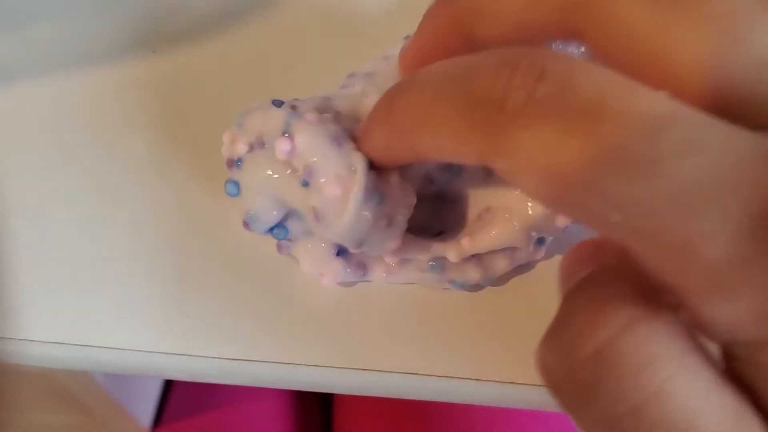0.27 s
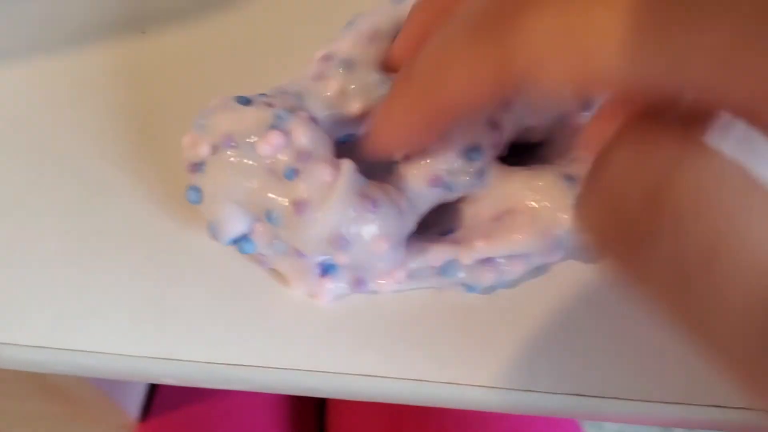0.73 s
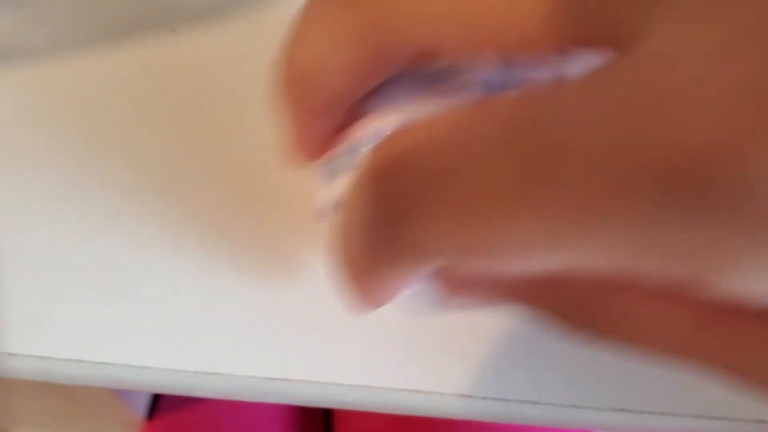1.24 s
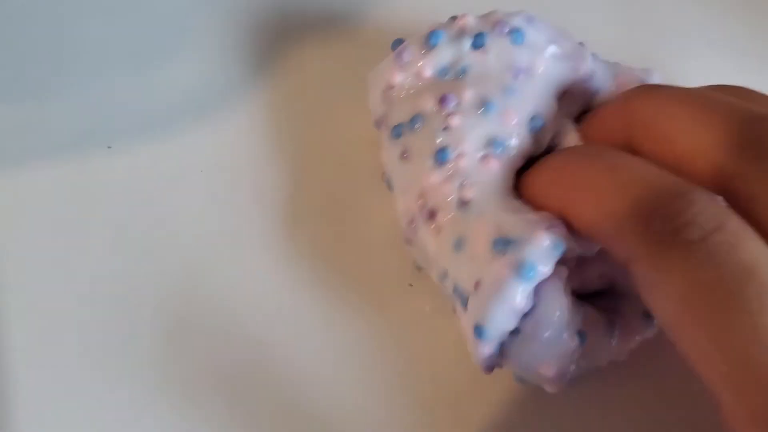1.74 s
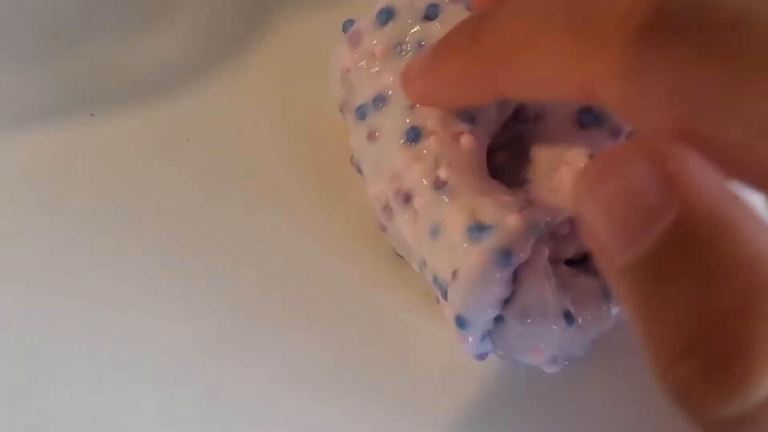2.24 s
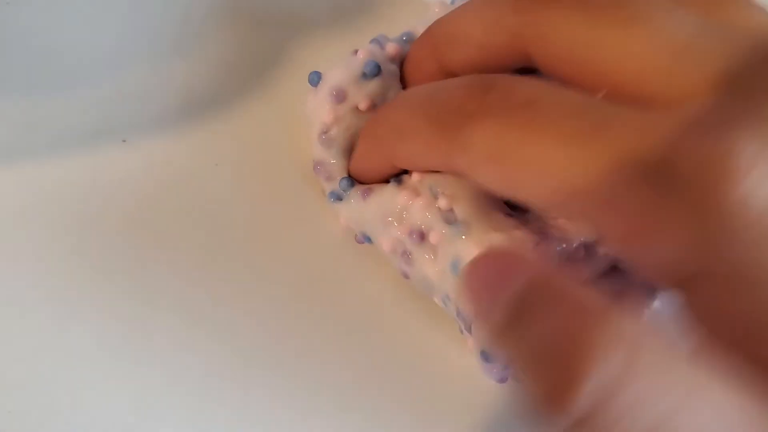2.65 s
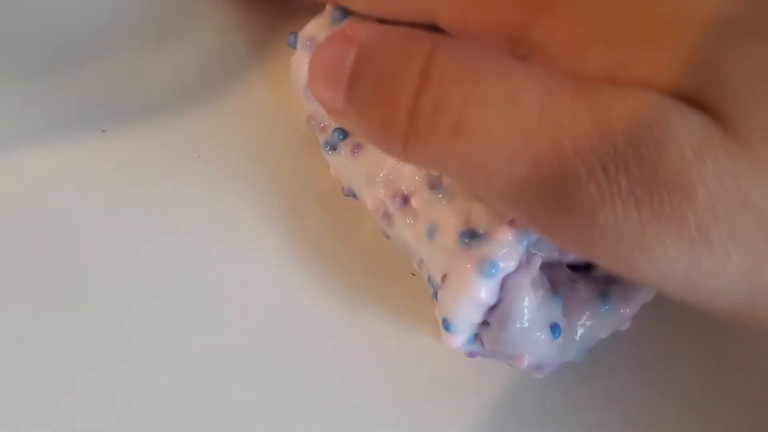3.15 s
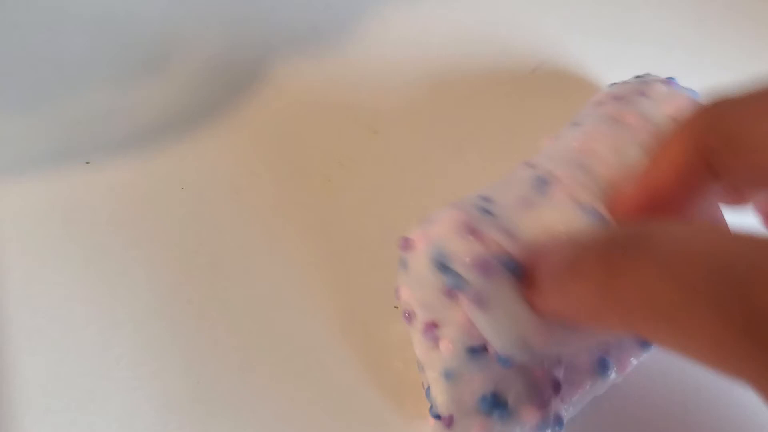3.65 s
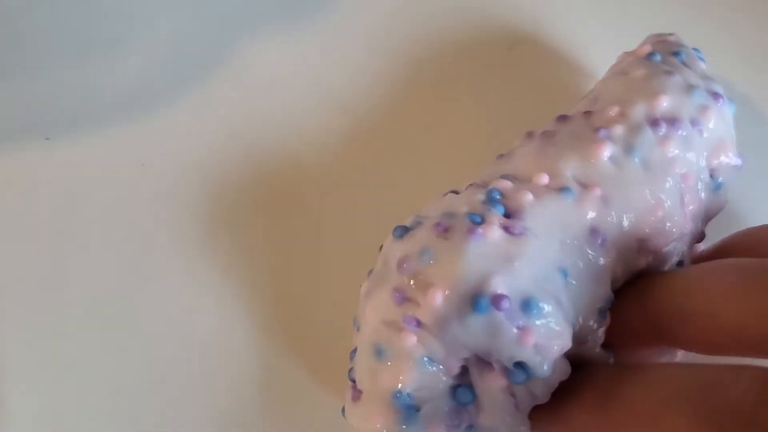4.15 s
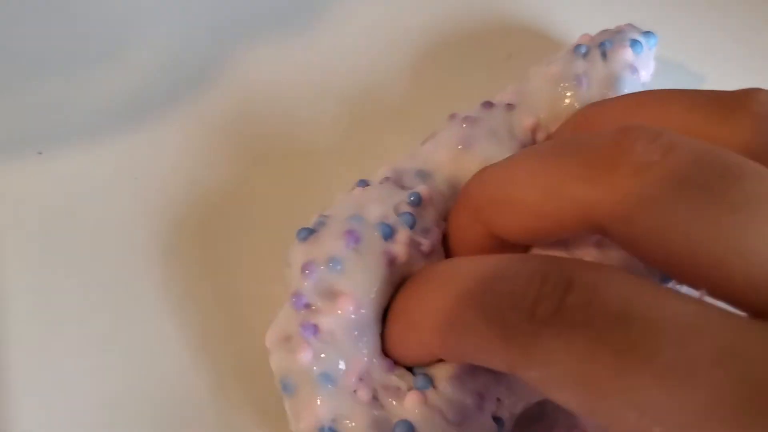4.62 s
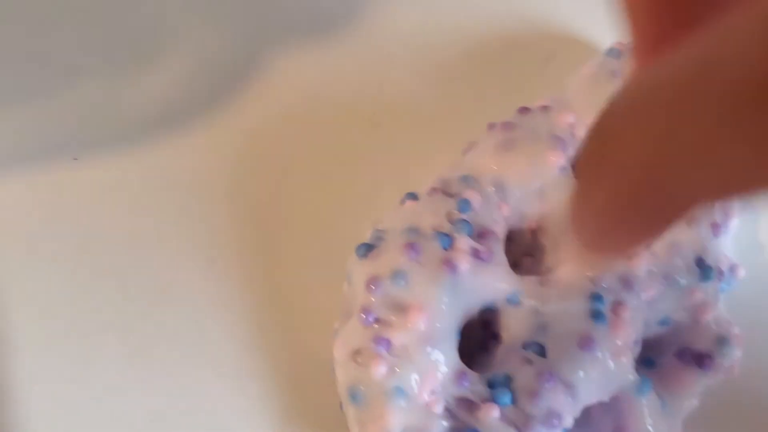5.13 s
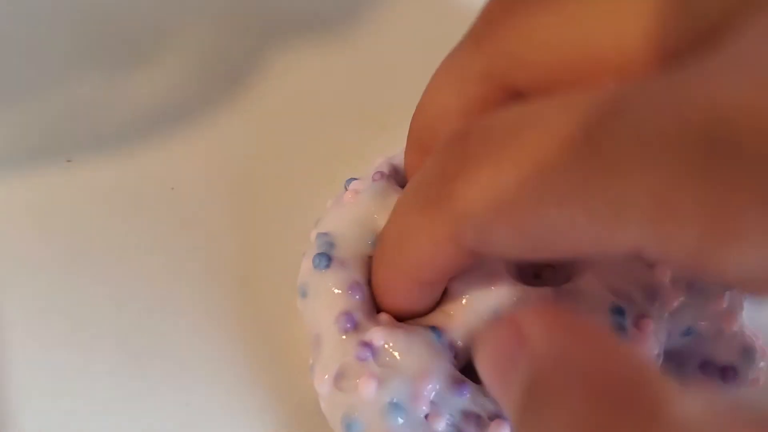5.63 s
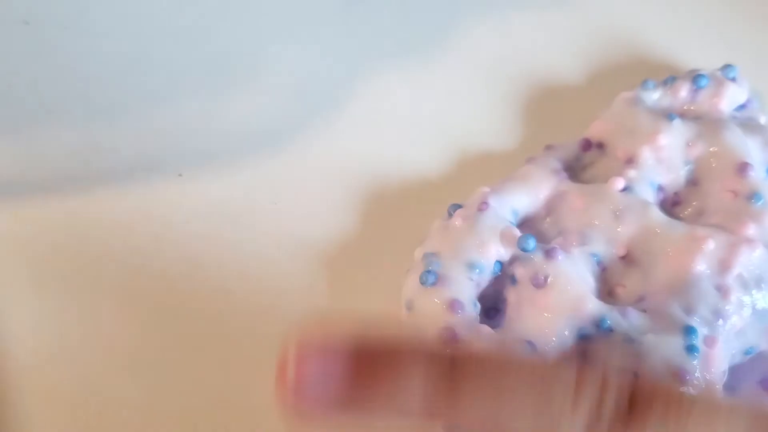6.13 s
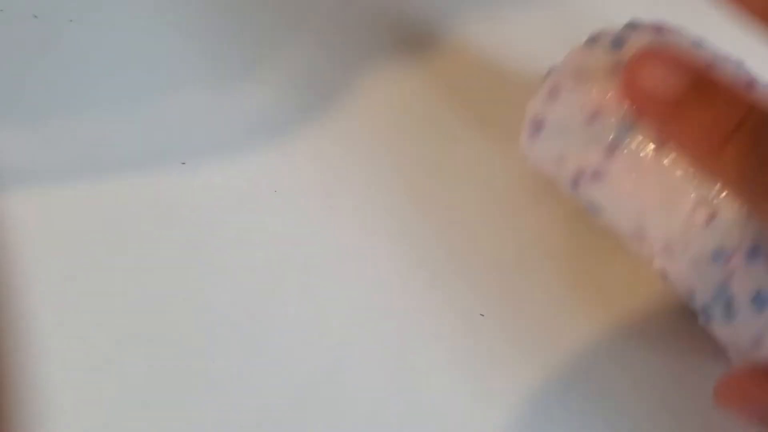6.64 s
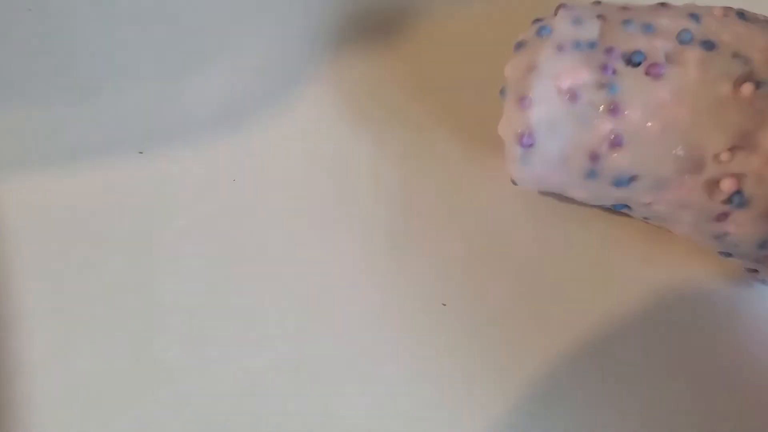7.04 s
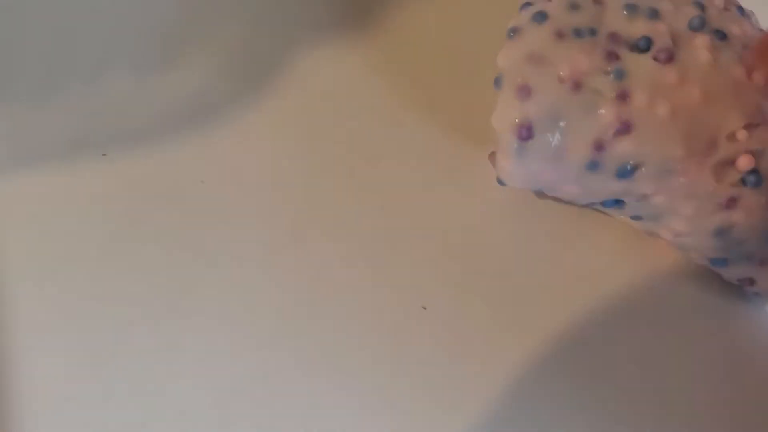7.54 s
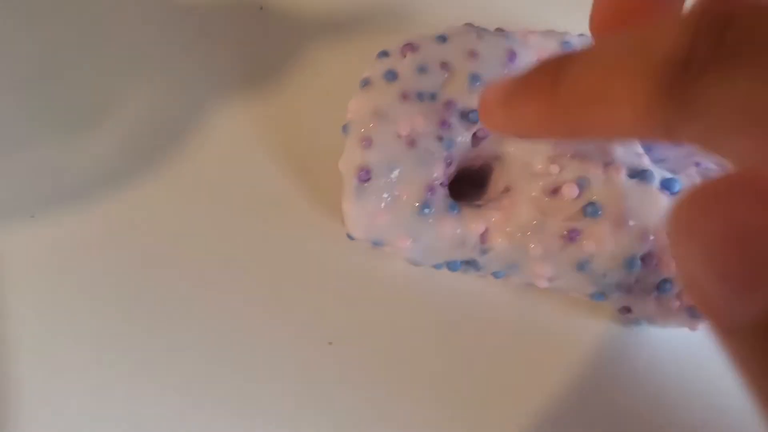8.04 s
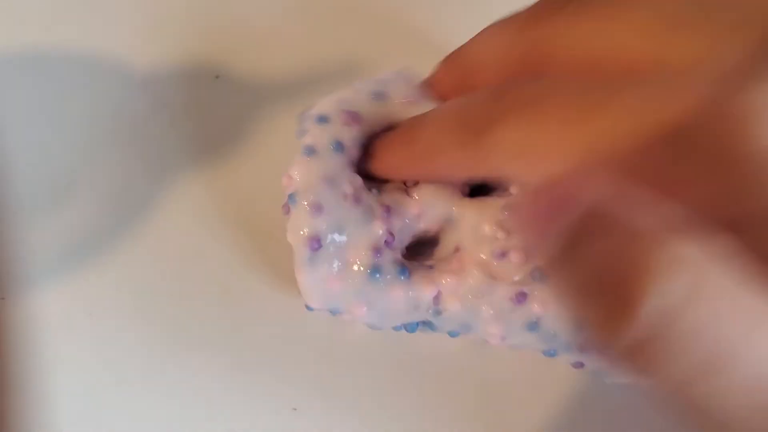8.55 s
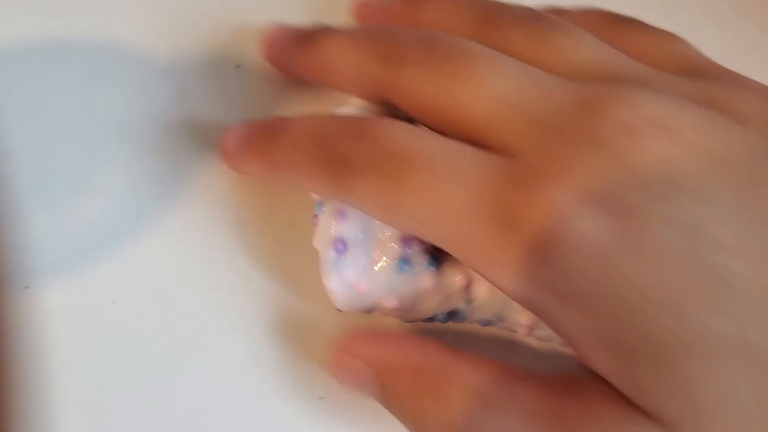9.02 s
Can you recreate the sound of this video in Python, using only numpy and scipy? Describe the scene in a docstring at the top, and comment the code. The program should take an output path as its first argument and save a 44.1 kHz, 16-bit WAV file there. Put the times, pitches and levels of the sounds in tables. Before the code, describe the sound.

Very close stereo pickup of fingers working bead-filled slime in a quiet small room. Crackly tearing opens strongly, then comes in separate pulls with near-quiet gaps. Tiny wet pops snap around it, some hollow, and the tabletop thuds softly. Air puffs from finger holes near the middle; later a peel crackles continuously, a sharp pop stands out, and faint clicks finish over rumble, hiss and unsteady low hum.

```python
"""Fingers poke, peel and fold soft slime with foam beads on a table, a hand's width from a phone.
Air pockets ring in short pops with a hollow boom and a treble snap; sticky threads tear in a dense
crackle made of coloured clicks and hiss. Finger holes puff air, and random pushes thud the table panel.
The quiet room adds a faint noise echo, rumble, hiss and a wavering hum.
The two microphone ports colour and delay the near sound differently."""
import sys
import numpy as np
from scipy import signal
from scipy.fft import rfft, irfft, next_fast_len
from scipy.io import wavfile
from scipy.ndimage import uniform_filter1d

SR = 44100
rng = np.random.default_rng(int(sys.argv[2]) if len(sys.argv) > 2 else 0)


def transcribe(u):
    """Save the signal u as a 16-bit wav file named by the first command-line argument.

    u: samples, shape (n,) or (channels, n), limited to [-1, 1]; the rate is SR.
    q: integer samples, one column per channel.
    """
    v = np.clip(np.atleast_2d(u).T, -1, 1)
    q = np.round(v * 32767).astype(np.int16)
    wavfile.write(sys.argv[1], SR, q)


N = 409190
SIZE = next_fast_len(N + SR)
HZ = np.arange(SIZE // 2 + 1) * SR / SIZE
T = np.arange(N) / SR


def undb(db):
    """Gain of a level in dB."""
    return 10 ** (np.asarray(db) / 20)


def level(x, db):
    """Scale to an rms level."""
    return x * undb(db) / np.sqrt(np.mean(x ** 2))


def over_hz(curve):
    """Read a (frequency, value) curve at every frequency, straight on a log axis."""
    hz, value = np.transpose(curve)
    return np.interp(np.log(HZ + 1), np.log(hz + 1), value)


def shape(x, gain):
    """Filter by a gain for each frequency."""
    return irfft(rfft(x, SIZE) * gain, SIZE)[..., :N]


def walk(rate):
    """Random levels held 1 / rate s and slewed twice, scaled to a spread of 1."""
    hold = int(SR / rate)
    steps = np.repeat(rng.standard_normal(N // hold + 1), hold)
    slow = uniform_filter1d(uniform_filter1d(steps, hold), hold)[:N]
    return slow / np.std(slow)


def grains(rate, spread_db, count):
    """Scattered clicks, a few far louder than the rest; each of count streams gets its own share of a click."""
    happens = rng.random(N) < rate / SR
    loudness = undb(spread_db * np.minimum(rng.exponential(1., N), 3))
    return happens * loudness * rng.standard_normal((count, N))


def ring(t, hz, t60):
    """A damped sine that starts at t = 0."""
    return np.sin(2 * np.pi * hz * t) * 1000. ** (-t / t60)


APART_DB = -2  # share that each port picks up on its own, from parts of the lump nearer to it


def both(x):
    """One stream common to the ports plus a weaker one for each."""
    return x[0] + undb(APART_DB) * x[1:]


# room noise before the low cut and slow waver: (frequency [Hz], left level [dB per Hz], right level [dB per Hz])
AIR_COLOUR = [(31.9, -90, -96.5), (61, -83.5, -76), (100, -78, -80), (174, -99, -95.5), (322, -100, -100),
              (526, -114, -114), (1050, -115, -116), (1754, -101, -119), (2500, -114, -120),
              (3350, -103, -117), (4360, -114, -121), (8770, -113, -120), (9350, -124, -126),
              (15500, -122, -126)]
# how alike the room noise is at the two ports: (frequency [Hz], likeness [0-1])
AIR_LIKENESS = [(60, 0.9), (130, 0.83), (290, 0.71), (640, 0), (1410, 0.2), (3100, 0.25), (6820, 0.04),
                (15000, 0.2)]
# ceiling of the hum before its flutter dips: (time [s], level [dB])
HUM_LEVELS = [(0.0, -72), (0.07, -50), (0.67, -77), (1.14, -56), (2.19, -65), (2.77, -96), (2.84, -58),
              (4.65, -62), (4.81, -80), (4.91, -49), (5.37, -58), (5.45, -73), (5.76, -52), (6.51, -68),
              (6.67, -54.5), (7.93, -58.5), (8.04, -46), (8.24, -70), (8.6, -56.5), (9.28, -82)]
AIR_LOW_HZ = 26.8
HUM_HZ, HUM_WANDER_HZ = 57.3, 1.486
HUM_LEAD, HUM_FLUTTER_DB = 0.33, 5  # left port leads by [radians]; spread of the random dips [dB]


def air():
    """Rumble and hiss of the room, most alike at both ports in the bass, with a wavering hum."""
    alike = np.clip(over_hz(AIR_LIKENESS), 0, 1)
    left, other = rfft(rng.standard_normal((2, SIZE))) * np.sqrt(SR / 2)
    pair = np.array([left, alike * left + np.sqrt(1 - alike ** 2) * other])
    colour = undb([over_hz(np.array(AIR_COLOUR)[:, [0, k]]) for k in (1, 2)])
    colour = colour / (1 + (AIR_LOW_HZ / (HZ + 1)) ** 4)
    noise = irfft(pair * colour, SIZE)[:, :N] * undb(walk(2.99))
    phase = 2 * np.pi * np.cumsum(HUM_HZ + HUM_WANDER_HZ * walk(6.7)) / SR
    hum = np.sqrt(2) * np.sin(phase + np.array([[HUM_LEAD], [0]]))
    hum_db = np.interp(T, *np.transpose(HUM_LEVELS)) - HUM_FLUTTER_DB * np.abs(walk(12))
    return noise + hum * undb(hum_db)


ROOM_T60_S, ROOM_DB = .2, -28


def echo(near):
    """The room answers with a faint tail of dying noise, starting 3 ms late."""
    t = np.arange(SR // 3) / SR
    tail = rng.standard_normal((2, len(t))) * 1000. ** (-t / ROOM_T60_S) * (t > .003)
    tail = undb(ROOM_DB) * tail / np.sqrt(np.sum(tail ** 2) / 2)
    return signal.fftconvolve(near, tail, axes=1)[:, :N]


# how the ports differ in strength: (frequency [Hz], left minus right level [dB])
PORT_BALANCE = [(200, 0.5), (700, 3), (1000, 2), (1500, 8), (2000, 19), (2800, 17), (3500, 22.5),
                (4500, -1.5), (5600, 17), (7000, -11), (8500, 7.5), (10000, 2.5), (11800, -6), (14000, 9)]
# how far the left port is ahead: (frequency [Hz], phase lead [radians])
PORT_PHASE = [(600, 0.01), (1500, 2.1), (3000, 0.94), (4500, 4.3), (8000, 7.6), (15000, 12.7)]


def ports(near):
    """The left port faces the slime and favours the range near 3 kHz; the right one is shaded and late."""
    ratio, lead = undb(over_hz(PORT_BALANCE)), over_hz(PORT_PHASE)
    # weighted to hold the level of the mean of the two, unless they oppose each other
    share = 2 / np.sqrt(1 + ratio ** 2 + 2 * ratio * np.maximum(np.cos(lead), 0))
    return shape(near, share * np.array([ratio, np.exp(-1j * lead)]))


# pulls of the fingers through the slime: (full from time [s], rise [s per 40 dB], hold [s],
# fall [s per 40 dB], threads level [dB], wet body level [dB], fine sizzle level [dB], table level [dB])
# levels are those at mid-hold, before the ports
FINGER_PULLS = [(0.047, 0.027, 0.086, 0.13, -57.5, -60.5, -61.5, -60),
                (0.353, .03, 0.055, 0.19, -74, -93, -80, -89),
                (0.448, 0.053, 0.074, 0.17, -72.5, -75, -74, -69),
                (0.745, 0.02, 0.036, .02, -59.5, -75, -63, -82),
                (.793, 0.017, 0.037, 0.12, -49, -47.5, -49.5, -57),
                (1.253, 0.11, 0.16, 0.21, -59.5, -69.5, -64, -66.5),
                (1.51, 0.027, .012, 0.21, -72, -77, -68, -90),
                (1.76, 0.09, 0.098, 0.28, -66.5, -73, -68.5, -68),
                (2.127, 0.032, 0.033, .1, -44.5, -49, -45.5, -49.5),
                (2.237, .02, .07, 0.17, -72.5, -77, -69.5, -83),
                (2.418, 0.033, 0.086, 0.2, -64, -76.5, -71.5, -95),
                (2.757, 0.027, 0.078, 0.13, -48.5, -57.5, -52.5, -57.5),
                (2.941, .03, 0.05, .05, -62.5, -75, -71.5, -67),
                (2.992, 0.013, 0.0054, 0.13, -49.5, -63.5, -60, -52),
                (3.31, 0.24, 0.1, 0.063, -72, -78, -84, -66),
                (3.434, 0.13, 0.12, 0.28, -67, -81.5, -73, -82),
                (3.686, .1, 0.051, 0.93, -69, -77, -73, -94),
                (4.009, 0.064, 0.11, 0.13, -68, -74, -72.5, -69.5),
                (4.258, 0.061, 0.04, 0.09, -54.5, -65, -56, -53.5),
                (4.579, 0.1, 0.11, 0.17, -65.5, -72.5, -70.5, -61),
                (4.871, .06, 0.18, 0.079, -72.5, -71.5, -68, -59),
                (5.103, .05, 0.022, 0.14, -58.5, -55.5, -57, -50),
                (5.515, 0.27, 0.05, .2, -66.5, -81, -78, -63.5),
                (5.771, 0.034, 0.053, 0.058, -51.5, -50.5, -53.5, -51.5),
                (5.834, 0.024, 0.079, 0.13, -85, -70.5, -72, -54),
                (6.378, 0.12, .11, .05, -63.5, -92, -67, -69),
                (6.504, 0.12, 0.1, 0.036, -52, -72.5, -61, -74),
                (6.634, 0.053, 0.11, 0.083, -55.5, -71, -59, -64.5),
                (6.833, 0.14, 0.023, .2, -70.5, -85, -78, -67.5),
                (7.035, 0.017, 0.017, 0.22, -77, -84, -82, -84),
                (7.167, 0.21, 0.14, 0.3, -73, -77, -70.5, -70),
                (7.433, 0.044, 0.017, 0.11, -60, -56, -53, -53),
                (7.768, 0.29, 0.022, 0.14, -65, -76, -70, -71.5),
                (8.002, 0.083, 0.043, 0.13, -65, -53.5, -52.5, -53.5),
                (8.292, 0.17, 0.1, 0.87, -70, -87, -76.5, -88),
                (8.735, .03, .04, 0.086, -67.5, -92.5, -93, -82),
                (8.626, 0.1, 0.052, 0.08, -57.5, -61, -56, -69.5),
                (9.003, 0.017, .03, .1, -72, -80, -91, -64),
                (9.065, 0.18, 0.023, 0.55, -63, -70.5, -70, -66.5),
                (9.249, .1, 0.05, .1, -71, -75, -63, -78)]
EDGE_DB = 40


def pull(column, gain_db, slower=1):
    """Gain of one layer of the pulls: a rise, a hold sloped by gain_db in all, a fall; overlaps add in power."""
    power = np.zeros(N)
    for row in FINGER_PULLS:
        s, rise, hold, fall = row[0], *np.maximum(row[1:4], .003)
        # the edges run twice as far, to 80 dB down
        times = s + np.cumsum([-2 * slower * rise, 2 * slower * rise, hold, 2 * slower * fall])
        span = slice(*np.searchsorted(T, times[[0, -1]]))
        levels = row[column] + np.array([-2 * EDGE_DB, -gain_db / 2, gain_db / 2, -2 * EDGE_DB])
        power[span] += undb(2 * np.interp(T[span], times, levels))
    return np.sqrt(power)


# resonances of the table top: (frequency [Hz], width [Hz], relative level [dB])
TABLE_MODES = [(111.5, 83, 11), (157, 21, -16), (233, 33, -0.5), (318.3, 11.4, 8.5), (464, 67, -14)]


def table():
    """Uneven pushes of the fingers shake the panel, which rises and falls slower than the slime."""
    push = both(grains(500, 0.7, count=3))
    panel = 0
    for hz, width, db in TABLE_MODES:
        panel = panel + undb(db) * 1j * HZ * width / (hz ** 2 - HZ ** 2 + 1j * HZ * width)
    panel = panel / (1 + (HZ / 600) ** 4)  # soft fingertips give no treble
    return level(shape(push, panel), 0) * pull(column=7, gain_db=-0.5, slower=1.8)


# air puffed out of a closing finger hole: (crest time [s], peak level before lean and ports [dB], width [ms])
HOLE_PUFFS = [(4.567, -52, 1.), (4.603, -50, 1.), (4.627, -47, 1.), (4.8465, -45, .8), (4.8668, -41, .8),
              (4.8865, -45, .7), (4.9095, -43, .7), (4.934, -46, .9), (5.748, -52, .8), (5.755, -51, .8),
              (5.857, -46, .9), (5.879, -47, .9), (5.912, -39, .9)]
PUFF_LEAN_DB = 5  # left over right


def puffs():
    """Each puff is one short bump of pressure with a dip on either side."""
    out = np.zeros(N)
    for s, db, width_ms in HOLE_PUFFS:
        x = ((T - s) * 2000 / width_ms).clip(-9, 9)
        out += undb(db) * (1 - x ** 2 / 2) * np.exp(-x ** 2 / 2)
    return out * undb([[PUFF_LEAN_DB / 2], [-PUFF_LEAN_DB / 2]])


# the threads give way in sudden fits that die off, over a steady pull
JERK_PER_S, JERK_FADE_S, JERK_BED = 150, 0.0021, 1.47


def jerks():
    """Gain that jumps at random moments and sinks back."""
    jumps = np.abs(grains(JERK_PER_S, 3.6, count=1)[0])
    return JERK_BED + signal.lfilter([1], [1, -np.exp(-1 / (JERK_FADE_S * SR))], jumps)


# colour of the tearing, each band levelled afterwards: (frequency [Hz], relative level [dB per Hz])
TEAR_COLOUR = [(300, -29.5), (550, -23.5), (760, -15.5), (1250, -13.5), (1500, -10), (1800, -5),
               (2300, -1.5), (2900, 3.5), (3500, -0.5), (4500, -10.5), (6500, -8), (10000, -14),
               (11700, -11), (16000, -27.5)]


def peel():
    """Threads snap by the thousand over a wet hiss; body, threads and sizzle follow the pull."""
    # every snap favours its own octave, so most are small coloured ticks
    centres = 500 * 2. ** np.arange(6)
    clicks = rfft(grains(1500, 6.9, count=6), SIZE)
    t = np.arange(400) / SR
    decay = 1000. ** (-t / (0.011 + 2.0 / centres[:, None]))
    smear = rfft(rng.standard_normal((len(centres), len(t))) * decay, SIZE)
    smear = smear / np.abs(smear)  # phase only: spreads a click in time, leaves its colour
    octave = np.cos(np.pi / 2 * np.log2((HZ + 1) / centres[:, None]).clip(-1, 1))
    snaps = irfft(np.sum(clicks * smear * octave, axis=0), SIZE)[:N]
    hiss = undb(walk(60)) * both(rng.standard_normal((3, N)))
    wet = (level(snaps, 0) + level(hiss, 1)) * jerks()
    # power shares below the two band edges [Hz]
    low, high = (1 / (1 + (HZ / edge) ** 8) for edge in (1300, 5000))
    body = pull(column=5, gain_db=1.5)
    threads = pull(column=4, gain_db=2)
    sizzle = pull(column=6, gain_db=1)
    out = 0
    for band, gain in ((low, body), (high - low, threads), (1 - high, sizzle)):
        out = out + level(shape(wet, np.sqrt(band) * undb(over_hz(TEAR_COLOUR))), 0) * gain
    return out


# small pockets: usual number a second, level over the threads and its spread, then their usual voice
SMALL_PER_S, SMALL_DB, SMALL_SPREAD_DB = 49, 5, 3.5
SMALL_HZ, SMALL_HOLLOW_DB, SMALL_HOLLOW_HZ, SMALL_SNAP_DB, SMALL_T60_S = 3010, -18, 1070, -11.5, 0.0079


def small_pops(count=10):
    """Small pockets burst by chance while a pull holds, at most count each; rows like those of POCKET_POPS."""
    s, _, hold, _, threads_db = (c[:, None] for c in np.transpose(FINGER_PULLS)[:5])
    draws = rng.standard_normal((7, len(s), count))
    place, keep, loud, hollow, hollow_pitch, snap, length = draws
    share = lambda x: (1 + np.tanh(.85 * x)) / 2  # a nearly even draw from 0 to 1
    start = s + hold * share(place)
    db = threads_db + SMALL_DB + SMALL_SPREAD_DB * loud
    silent = (share(keep) > SMALL_PER_S * hold / count) | (start > T[-1])
    db[silent] = -200
    rows = [np.minimum(start, T[-1]), db, np.full_like(start, SMALL_HZ),
            SMALL_HOLLOW_DB - 8 * np.abs(hollow), SMALL_HOLLOW_HZ * 1.01 ** hollow_pitch,
            SMALL_SNAP_DB + 7 * snap, SMALL_T60_S * 1.5 ** length]
    return np.reshape(rows, (len(rows), -1)).T


# the clear bursts of air pockets: (time [s], pocket peak before lean and ports [dB], pocket pitch [Hz],
# hollow level re pocket [dB], hollow pitch [Hz], snap level re pocket [dB], base decay time to -60 dB [s])
POCKET_POPS = [(0.0504, -25, 3140, -12, 1150, 0.5, 0.013), (0.0804, -29.5, 2940, -33, 1150, -12, 0.0099),
               (0.091, -36.5, 2760, -6.5, 784, 2, 0.022), (0.114, -31, 2800, -10, 1260, -18, 0.0032),
               (0.15, -38, 2980, -22, 1410, -14, 0.011), (0.343, -58, 3440, -24, 1370, 6, 0.014),
               (0.4934, -51.5, 2760, -40, 920, 7.5, 0.016), (0.7362, -46.5, 5440, -35, 1340, 10, 0.0093),
               (0.7923, -20.5, 1900, -9.5, 1340, -10.5, 0.014), (0.8359, -36, 2580, -4, 1360, 3, 0.013),
               (0.8755, -34.5, 2680, -35, 1300, -34, 0.026), (1.2633, -34.5, 2800, -37, 980, -9, 0.0062),
               (1.3064, -36, 3100, -16, 1150, -19, 0.009), (1.3235, -34, 3080, -22, 1180, -15, 0.0046),
               (1.348, -51, 2500, -18, 1400, -7, .008), (1.3607, -34.5, 2750, -28, 1300, 1.5, 0.0036),
               (1.3969, -31.5, 3000, -44, 790, -6, 0.0064), (1.4268, -49.5, 3100, -21, 1130, 8, .008),
               (1.5205, -36.5, 2930, -32, 990, -8.5, 0.015), (1.7614, -34, 2780, -28, 794, 9, 0.013),
               (1.7725, -40.5, 2830, -36, 1400, 8.5, 0.01), (1.8444, -48.5, 1850, -23, 1410, 10, 0.022),
               (2.118, -31.5, 2680, -3.5, 815, 14, 0.015), (2.1579, -21, 3430, -16, 1350, -19, 0.0044),
               (2.188, -41, 3080, -21, 560, -14, .006), (2.2367, -39, 2850, -48, 1040, -8, 0.018),
               (2.2847, -38.5, 2440, -39, 1350, -1, 0.011), (2.4149, -30.5, 3080, -37, 1020, -10, .01),
               (2.4467, -44, 2400, -22, 830, -12, 0.0097), (2.5136, -40, 2990, -49, 1220, -23, 0.012),
               (2.7431, -25, 3200, -48, 1260, -34, 0.0078), (2.754, -38, 3180, -26, 1330, -13, .008),
               (2.778, -24.5, 2820, -30, 1370, 0, 0.0042), (2.7935, -24.5, 3500, -12, 1290, -2, 0.0075),
               (2.8478, -34, 2990, -16, 1290, -13, .008), (2.8607, -38, 2920, -28, 1340, 5.5, 0.011),
               (3.002, -22.5, 3390, -51, 1250, -15, 0.012), (3.573, -46.5, 2860, -39, 1360, -1, 0.0061),
               (3.6786, -45.5, 3050, -30, 1200, -13, .01), (3.7359, -42.5, 3130, -14, 1290, -21, 0.01),
               (3.7798, -46.5, 3920, -27, 1190, 2.5, 0.01), (3.866, -43, 3100, -43, 1350, -6, 0.0087),
               (3.9903, -41.5, 2130, -34, 780, -36, 0.01), (4.0792, -24, 2880, -27, 760, 3.2, 0.0099),
               (4.256, -31, 2900, -11, 845, 6.5, 0.0053), (4.2606, -42.5, 3260, 0, 824, 3, 0.064),
               (4.6759, -26, 3120, -23, 774, 1.3, 0.0064), (4.8608, -49, 1340, -15, 566, -36, 0.013),
               (4.8912, -42.5, 2900, -7, 800, -11, 0.0054), (4.9095, -40, 3260, -8, 554, 5.5, .0094),
               (4.9218, -41.5, 5730, -20, 555, -8, 0.029), (5.097, -41.5, 2960, 7, 710, 9, 0.0068),
               (5.1231, -29.5, 1120, 1.5, 890, -1, 0.0084), (5.1501, -40.5, 5640, -5, 670, -1, 0.0099),
               (5.431, -39, 3900, -43, 1320, -38, 0.015), (5.5433, -43, 2780, -27, 670, -16, 0.01),
               (5.595, -50.5, 3100, -17, 567, -22, 0.019), (5.7696, -21.5, 2840, -38, 1080, -28, 0.019),
               (5.7817, -23, 2110, -9.5, 1060, -14, 0.024), (5.8064, -27.5, 1200, -11, 800, 0, 0.02),
               (5.8208, -40.5, 3510, 6, 746, 13, 0.0064), (6.3797, -54, 3480, -27, 1400, 11.5, 0.0087),
               (6.4387, -39, 3130, -38, 1120, -17, 0.012), (6.51, -37.5, 2980, -26, 810, -9, 0.031),
               (6.5235, -35, 2960, -23, 775, -13, 0.014), (6.5367, -36, 3025, -31, 770, -2, 0.011),
               (6.558, -37, 3240, -37, 1300, -4, 0.01), (6.5689, -46, 3280, -24, 1140, -12, .009),
               (6.5779, -30.5, 3300, -27, 1080, -9, 0.0054), (6.588, -42, 2680, -21, 830, -16, 0.013),
               (6.5991, -22.5, 3050, -38, 830, -11, 0.0072), (6.641, -39, 2830, -25, 806, -17, 0.014),
               (6.6556, -48, 2950, -21, 800, -22, 0.015), (6.6711, -56, 3500, -24.5, 820, -4, 0.0078),
               (6.6848, -36, 2980, -37, 890, -11, 0.013), (6.696, -54, 2920, -13, 800, 6, .005),
               (6.7115, -33, 3220, -17, 796, -22, 0.012), (6.725, -45, 3340, -6, 795, -16, 0.0099),
               (6.7332, -24.5, 3220, -41, 800, -4.5, .003), (6.8621, -50.5, 2640, -27, 1400, -8, 0.023),
               (7.039, -49, 2680, -35, 574, -12, 0.038), (7.095, -49, 2910, -33, 820, -14, 0.011),
               (7.169, -51.5, 2800, -12, 770, 11, 0.0081), (7.2476, -49, 1980, -23, 780, 8, 0.007),
               (7.2643, -50, 2800, -22, 790, -12, .02), (7.2748, -49, 1910, -30, 1270, -17, 0.022),
               (7.2894, -43.5, 1860, -37, 1276, -13, 0.024), (7.4298, -38.5, 1860, -0.5, 800, 10.5, 0.033),
               (7.4554, -37.5, 2750, -19, 1180, 2, .024), (7.7731, -33.5, 2880, -50, 1227, -1.5, 0.014),
               (7.9852, -47, 2910, -3.5, 580, 9, 0.0102), (7.9948, -27.5, 2820, 1.5, 1267, 12, 0.021),
               (7.9961, -11.5, 2960, -26, 1250, -5, 0.013), (7.9972, -21, 1550, -16, 1310, 1, 0.0048),
               (8.04, -46, 1280, 12, 980, 2, 0.0036), (8.308, -49, 2910, -28, 1310, -10, 0.0041),
               (8.3398, -53, 2930, -18, 1130, 6, .006), (8.39, -54, 2970, -16, 1400, 11.5, 0.011),
               (8.3957, -46.5, 2900, -30, 1400, -4, 0.0093), (8.577, -52.5, 2200, -30, 1200, -2, 0.021),
               (8.616, -36, 3350, -37, 1020, -16, 0.0044), (8.7539, -47.5, 2240, -38, 1320, -24, 0.013),
               (9.005, -52.5, 2880, -12, 638, -20, 0.022), (9.163, -46.5, 2770, -26, 980, -20, 0.017),
               (9.2417, -35.5, 3000, -28, 1040, -16, 0.0059)]
LEAN_SPREAD_DB = 2  # random balance of a pop between the ports


def pops():
    """The pocket rings a few cycles, the finger hole booms lower, the torn skin snaps in the treble."""
    rows = np.vstack([POCKET_POPS, small_pops()])
    s, db, hz, hollow_db, hollow_hz, snap_db, t60 = (c[:, None] for c in rows.T)
    lean_db = LEAN_SPREAD_DB * rng.standard_normal(len(s))
    t = np.arange(1536) / SR
    t60 = np.clip(t60, .003, .05)
    noise = both(rng.standard_normal((3, len(s), 2 * len(t))))
    rise = 1 - np.exp(-t / 0.000095)
    fade = rise * 1000. ** (-t / t60)
    rough_band = signal.butter(2, [1300, 5000], "band", fs=SR, output="sos")
    snap_band = signal.butter(2, [5200, 12500], "band", fs=SR, output="sos")
    rough = signal.sosfilt(rough_band, noise[..., ::2] * fade)
    snap = signal.sosfilt(snap_band, noise[..., 1::2] * fade ** 1.7)
    top = lambda x: x / np.abs(x).max(axis=(0, 2), keepdims=True)  # peak of each pop to 1
    burst = rise * ring(t, hz, t60 / 2)  # the first swing is far the strongest
    after_ring = rise * ring(t, hz, 2 * t60)
    pocket = top(burst + .15 * after_ring + .7 * top(rough))
    hollow = rise * ring(t, hollow_hz, np.minimum(2.4 * t60, .03))
    pop = undb(db) * (pocket + undb(hollow_db) * hollow + undb(snap_db) * top(snap))
    out = np.zeros((2, N + len(t)))
    for start, one, lean in zip((s[:, 0] * SR).astype(int), pop.swapaxes(0, 1), lean_db):
        out[:, start:start + len(t)] += undb([[lean / 2], [-lean / 2]]) * one
    return out[:, :N]


def scene():
    """Slime and table at the ports, their faint echo, and the room air."""
    near = ports(pops() + peel() + table() + puffs())
    return near + echo(near) + air()


def record(dry):
    """The phone cuts the top above 16.3 kHz with a steep low-pass."""
    return signal.sosfilt(signal.ellip(8, .2, 70, 16300, fs=SR, output="sos"), dry)


dry = scene()
out = record(dry)
transcribe(out)
```